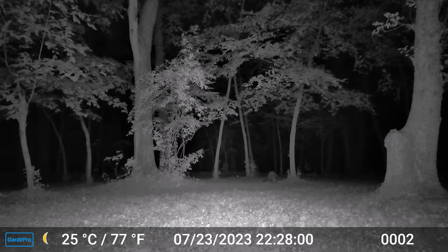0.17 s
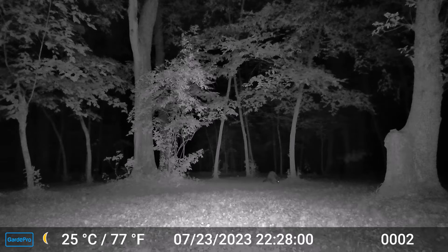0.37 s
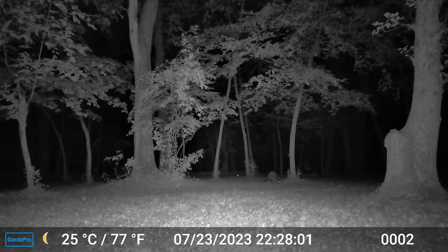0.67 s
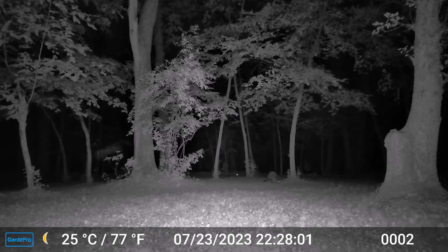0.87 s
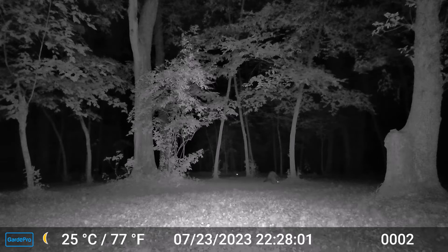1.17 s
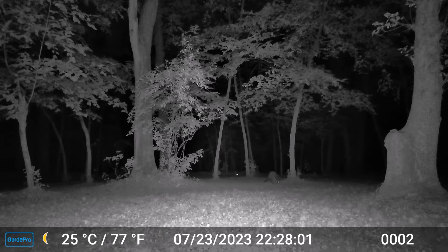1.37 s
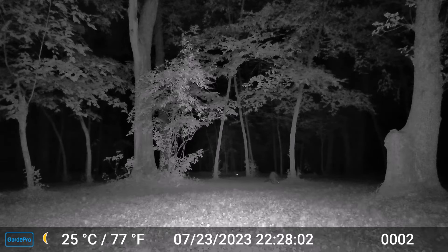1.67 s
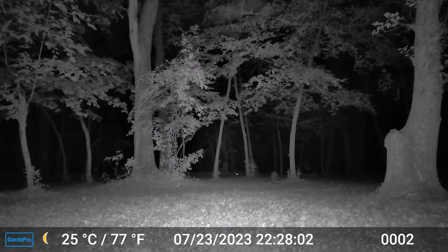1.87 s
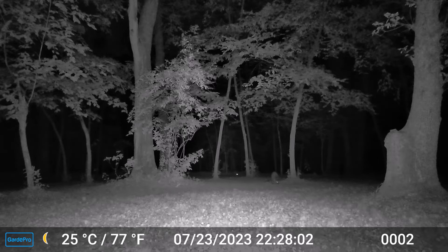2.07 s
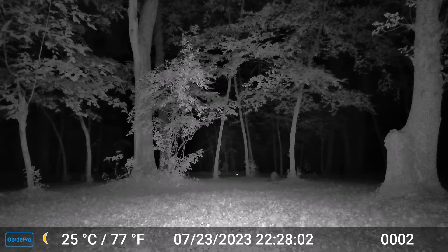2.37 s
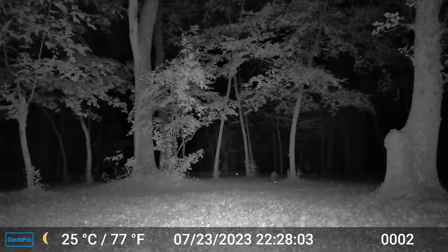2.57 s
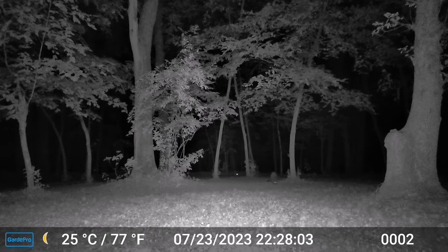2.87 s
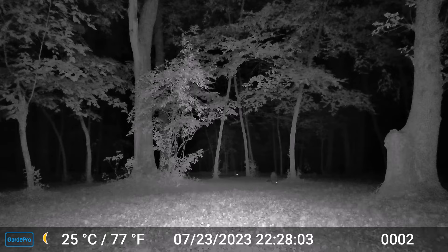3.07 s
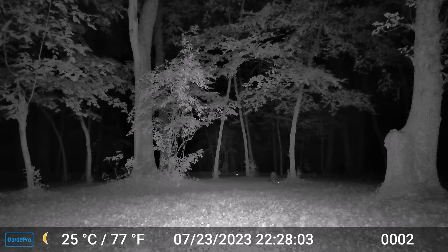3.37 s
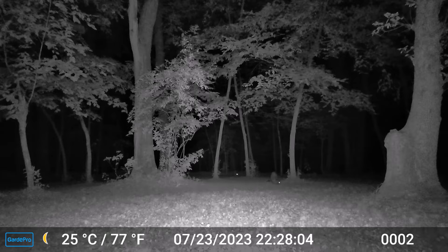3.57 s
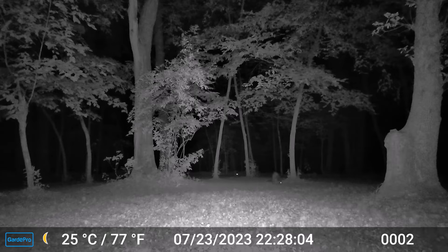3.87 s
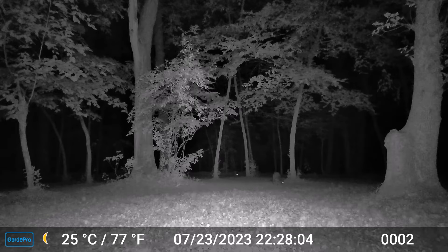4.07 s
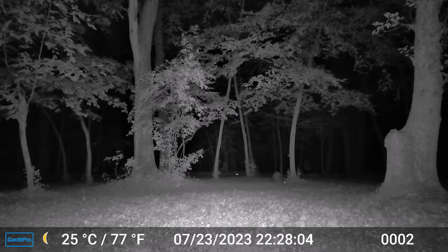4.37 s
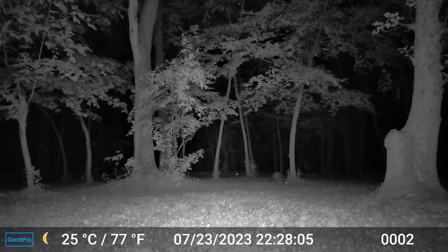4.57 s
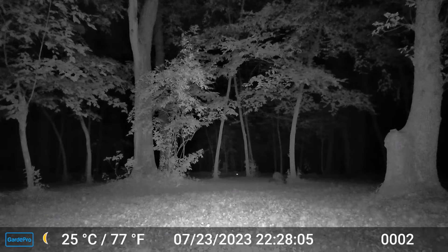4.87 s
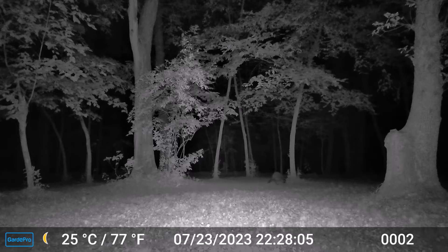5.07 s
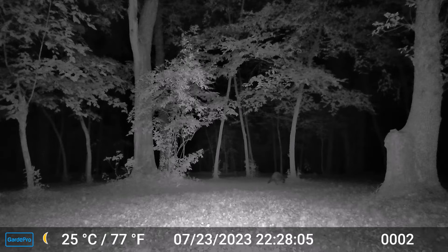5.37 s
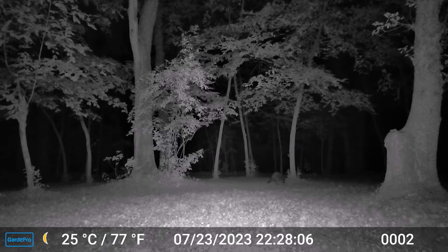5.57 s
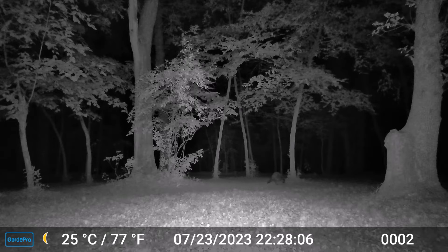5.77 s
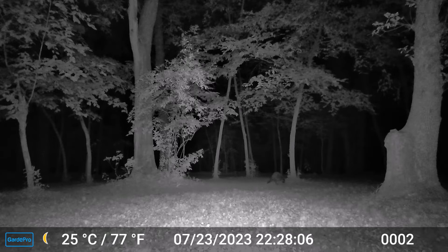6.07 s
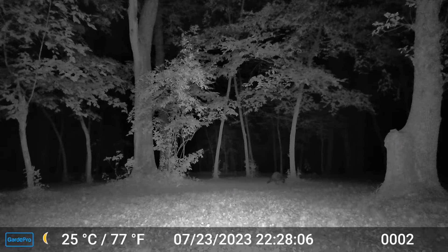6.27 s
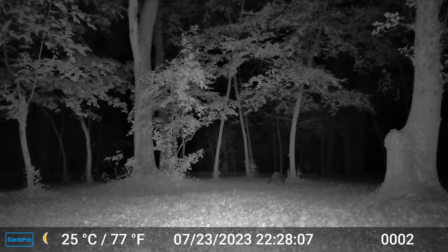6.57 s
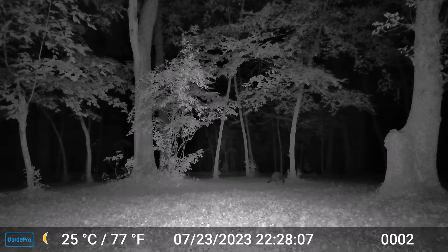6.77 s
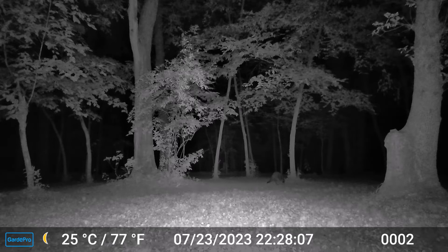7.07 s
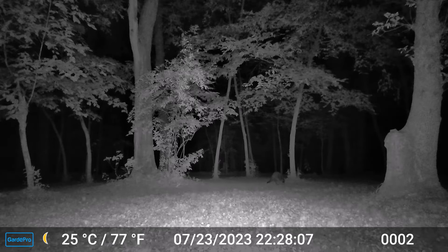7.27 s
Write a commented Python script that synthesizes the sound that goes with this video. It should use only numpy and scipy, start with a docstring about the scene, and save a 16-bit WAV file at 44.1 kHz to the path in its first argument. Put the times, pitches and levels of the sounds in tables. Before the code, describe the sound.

Pulsed katydid rasping alternates between close and far in dark woods, with soft cricket trills, faint insect shimmer, dull thuds and a deep rumble.

```python
"""A near katydid rasps in bursts of five to eight strokes at a woodland edge at night, heard by a trail camera.
A duller one answers from deeper in the trees; both are wing-tooth clicks shaped by resonances and echo.
Crickets trill behind them in short falling tones, over a throbbing faint song and a hiss of distant insects.
Underneath lie a low rumble of filtered noise with soft thuds, and a faint far drone that swells twice."""
import sys
import numpy as np
from scipy import signal
from scipy.fft import rfft, irfft, next_fast_len
from scipy.io import wavfile
from scipy.ndimage import uniform_filter1d, map_coordinates

SR = 44100
rng = np.random.default_rng(int(sys.argv[2]) if len(sys.argv) > 2 else 0)


def store_wav(level_fs):
    """Save 16-bit WAV to argv[1]."""
    pcm = np.round(np.clip(np.atleast_2d(level_fs), -1, 1) * 32767)
    wavfile.write(sys.argv[1], SR, pcm.T.astype(np.int16))


N = 326781  # length of the scene in samples

# course of the low rumble, before each layer's offset: (time [s], level [dB])
RUMBLE_COURSE = [(0.0, -48.5), (0.78, -50), (0.95, -46), (1.51, -49), (1.73, -45.5), (2.06, -49),
                 (2.95, -44), (3.38, -45), (3.61, -47), (4.08, -47), (4.42, -48.5), (4.89, -45.5),
                 (5.92, -50.5), (7.41, -50)]


def near_katydid(deep_db=-16.0, low_db=-7.0, high_db=-6.0, deep_hz=2250, split_hz=3900, lead=.0075):
    """Tooth clicks ring the wing: its deepest mode peaks early in a stroke, the high ones next, the middle last."""
    # broad colour of the insect: (frequency [Hz], level [dB])
    near_body = [(1000, -47), (1400, -33), (1850, -28), (2100, -9.5), (2750, -11), (3100, 0), (3800, -6.5),
                 (4700, 4.5), (5200, -5.5), (5700, -7.5), (6200, -23.5), (7000, -30.5), (7500, -32),
                 (8000, -53.5)]
    # wing resonances, and narrow lines from the fixed echo of the leaves around the insect:
    # (frequency [Hz], width [Hz], level above the broad colour [dB])
    fine_lines = [(1624, 120, 15), (2047, 130, 11.5), (2900, 67, 6.5), (3340, 30, 4.5), (3140, 34, 6.5),
                  (3430, 61, -4), (3542, 7.3, 0), (3727, 12, 5.5), (4137, 63, 7), (4250, 12, 3),
                  (4421, 18, 4), (4670, 22, 3.5), (4930, 13, 6.5), (5352, 53, 9.5), (5730, 16, 7.5),
                  (7280, 40, 9)]
    # bursts, levels before the band offsets: (middle of first stroke, nominal [s], strokes [count],
    # stroke spacing [s], level [dB], fade by the last stroke [dB], first stroke length [s])
    near_bursts = [(0.443, 6, 0.15, -33.5, .7, .112), (2.196, 8, 0.15, -33, 1.5, .132),
                   (4.49, 7, .1526, -33, 6, .124), (6.819, 5, 0.15, -34.5, -3, 0.12)]
    shortening, dulling_db = .2, 2  # by the last stroke: share of length lost, loss of the high modes

    def colour_db(hz):
        peaks_db = sum(db * np.exp(-((hz - centre) / width) ** 2) for centre, width, db in fine_lines)
        return along(near_body, hz) + peaks_db

    deep, low, high = np.zeros((3, N))
    for s, db, progress, length in strokes(near_bursts):
        span = length * (1 - shortening * progress)
        tooth_hz = 330 * np.exp(rng.normal(0, .05))
        clicks = teeth(span, tooth_hz, jitter=.2, uneven_db=1.5, scrape=.25)
        stroke_high_db = high_db - dulling_db * progress
        parts = [(deep, deep_db, pressed(clicks, peak_at=0.45, fullness=1.4, ragged_db=2.5)),
                 (low, low_db, pressed(clicks, peak_at=0.69, fullness=2.17, ragged_db=1.5)),
                 (high, stroke_high_db, pressed(clicks, peak_at=0.55, fullness=1.05, ragged_db=1.65))]
        for track, band_db, rasp in parts:
            heard = through_woods(rasp, leaves_db=-0.5, leaves_t60=0.098, woods_db=-9.0, woods_t60=1.1)
            add(track, s - span / 2 - lead, amp(db + band_db) * heard)
    deep = coloured(deep, lambda hz: colour_db(hz) + under(hz, deep_hz))
    low = coloured(low, lambda hz: colour_db(hz) + under(deep_hz, hz) + under(hz, split_hz))
    high = coloured(high, lambda hz: colour_db(hz) + under(split_hz, hz))
    return deep + low + high


def far_katydid(low_db=-6.5, high_db=-7.5, split_hz=2800, length=0.1, lead=.062):
    """The same kind of rasp, dulled by the trees between; each stroke climbs from low modes to higher ones."""
    # broad colour at this distance: (frequency [Hz], level [dB])
    far_body = [(1300, -39), (1950, -17), (2150, -2.5), (2550, -2), (2800, -8), (3050, -9), (3280, -1.5),
                (3530, -5.5), (3700, -15), (5000, -26), (6500, -54)]
    # bursts, levels before the band offsets: (middle of first stroke, nominal [s], strokes [count],
    # stroke spacing [s], level [dB], fade by the last stroke [dB])
    far_bursts = [(0.015, 2, .149, -49.5, 0.7), (1.173, 4, .153, -50.5, 0.5), (2.713, 6, .154, -44, 10),
                  (4.556, 4, .151, -43.5, 6.5), (6.197, 4, .148, -48.5, -1.3)]
    low, high = np.zeros((2, N))
    for s, db, _ in strokes(far_bursts):
        clicks = teeth(length, tooth_hz=295.5, jitter=0.17, uneven_db=1.5, scrape=0.34)
        parts = [(low, low_db, pressed(clicks, peak_at=0.51, fullness=1.0, ragged_db=2.5)),
                 (high, high_db, pressed(clicks, peak_at=0.73, fullness=0.97, ragged_db=1.3))]
        for track, band_db, rasp in parts:
            heard = through_woods(rasp, leaves_db=-2, leaves_t60=0.088, woods_db=-5.5, woods_t60=1.0)
            add(track, s - lead, amp(db + band_db) * heard)
    low = coloured(low, lambda hz: along(far_body, hz) + under(hz, split_hz))
    high = coloured(high, lambda hz: along(far_body, hz) + under(split_hz, hz))
    return low + high


def strokes(bursts, fade_power=2.2, scatter_db=.5):
    """Evenly paced strokes, their level change late in the burst: (s, dB, progress 0-1, further columns)."""
    for start, count, period, db, fade_db, *rest in bursts:
        for k, progress in enumerate(np.linspace(0, 1, round(count))):
            level_db = db - fade_db * progress ** fade_power + rng.normal(0, scatter_db)
            yield (start + k * period, level_db, progress, *rest)


def teeth(length, tooth_hz, jitter, uneven_db, scrape):
    """A scraper drawn over the wing's file: a click per tooth, with some friction between."""
    n = int(length * SR)
    gaps = np.exp(jitter * rng.standard_normal(128)) / tooth_hz
    at = ((np.cumsum(gaps) - gaps[0] * rng.random()) * SR).astype(int)
    strengths = amp(uneven_db * rng.standard_normal(128))
    clicks = np.bincount(at, strengths, n)[:n]
    return unit(clicks) + scrape * rng.standard_normal(SR // 2)[:n]


def pressed(clicks, peak_at, fullness, ragged_db):
    """The wing pressure swells unevenly to a peak at some share of the stroke, then lets go."""
    u = np.linspace(0, 1, len(clicks))
    phase = np.interp(u, [0, peak_at, 1], [0, .5, 1])
    swell = np.abs(np.sin(np.pi * phase)) ** fullness  # a higher power narrows the peak
    slips = np.interp(u, np.linspace(0, 1, 10), rng.standard_normal(10))
    return unit(clicks * swell * amp(ragged_db * slips))


def near_cricket(level_db=0.3, scatter_db=2.5, trill_s=.18, pulse_hz=29.3):
    """Bouts of short, evenly spaced trills, each a run of falling pulses, one per wing closure."""
    # bouts, before the level offset: (start [s], trills [count], trill spacing [s], level [dB])
    cricket_bouts = [(0.04, 3, 0.23, -54), (1.34, 3, .325, -52.5), (3.36, 4, .283, -53),
                     (5.645, 4, .247, -52.5)]
    track = np.zeros(N)
    for start, count, period, db in cricket_bouts:
        for trill in start + period * np.arange(round(count)):
            for s in trill + np.arange(0, trill_s, 1 / pulse_hz):
                pulse = cricket_pulse(pitch_hz=4835 + rng.normal(0, 11), fall_hz=460, length=.021)
                pulse_db = db + level_db + rng.normal(0, scatter_db)
                add(track, s + rng.normal(0, 0.00093), amp(pulse_db) * pulse)
    return track + amp(-4) * scattered(track, t60=.3)[:N]


def far_crickets(level_db=-61.5, count=4):
    """More crickets, each at its own pitch and pace, merge into one shimmering line."""
    track = np.zeros(N)
    for spread, pace, start in rng.uniform(-1, 1, (count, 3)):
        for s in np.arange(start - 1, N / SR, 1 / (30 + 3 * pace)):
            pitch_hz = 4830 + 50 * spread + rng.normal(0, 15)
            pulse = cricket_pulse(pitch_hz, fall_hz=320, length=.019)
            add(track, s + rng.normal(0, 0.0017), amp(rng.normal(0, 1.3)) * pulse)
    return amp(level_db) * unit(track + amp(-2.5) * scattered(track, t60=.4)[:N])


def cricket_pulse(pitch_hz, fall_hz, length):
    """One wing closure: a pure tone that sags as the wing slows."""
    u = np.linspace(-.5, .5, int(length * SR))
    phase = 2 * np.pi * np.cumsum(pitch_hz - fall_hz * u) / SR
    return np.cos(np.pi * u) * np.sin(phase)


def tree_crickets(level_db=-66.5, pitch_hz=3080, width_hz=110, throb_hz=3.7, depth_db=4.5):
    """A faint lower song from far away: a narrow band of noise, throbbing loosely."""
    def band_db(hz):
        return -20 * np.log10(1 + ((hz - pitch_hz) / (2 * width_hz)) ** 2)

    song = unit(coloured(rng.standard_normal(N), band_db))
    throb = np.cos(2 * np.pi * throb_hz * np.arange(N) / SR + .6 * wobble(1.7))
    return amp(level_db + depth_db * throb + 1.5 * wobble(8)) * song


def chorus(level_db=-57.5):
    """The hiss of countless distant insects: coloured noise with a drifting level."""
    # colour of the hiss: (frequency [Hz], spectral level [dB])
    hiss_colour = [(200, 2), (700, -0.5), (1300, -4.5), (2100, 1.5), (2750, -0.5), (3060, 4), (3600, -1),
                   (4400, 3.5), (5400, -2), (5900, 1), (6400, 7.5), (6850, -0.5), (7250, -8), (8000, -25.5)]
    drift_db = 1.0 * wobble(1.9) + .7 * wobble(14)
    return amp(level_db + drift_db) * noise(hiss_colour)


def rumble(rumble_db=1.5, drone_db=-14.5, swell_width_hz=90, swell_peak_db=5):
    """A restless low rumble of noise; a far drone follows it and swells twice above it."""
    # colours of rumble and drone: (frequency [Hz], spectral level [dB])
    bass_colour = [(11, -38), (18, -13), (54, 1), (86, 0.5), (140, -4.5), (243, -22), (300, -26.5),
                   (390, -41), (660, -120)]
    drone_colour = [(110, -6.5), (180, 4.5), (270, -2.5), (340, 0), (420, 1.5), (490, -4.5), (570, -14.5),
                    (900, -35)]
    # swells of the drone: (time of the top [s], level [dB], rise [s], fall [s], strongest pitch [Hz])
    drone_swells = [(2.08, -50.5, .2, 0.34, 249), (5.019, -53, 0.1, .1, 311)]
    level_db, = curves(RUMBLE_COURSE)
    t = np.arange(N) / SR
    bass = amp(level_db + rumble_db + 2.56 * wobble(12)) * noise(bass_colour)
    drone_level_db = level_db + drone_db + 1.2 * wobble(8)
    drone = amp(drone_level_db) * patchy(noise(drone_colour), depth_db=3.0)
    for s, db, rise, fall, pitch_hz in drone_swells:
        tone = coloured(noise(drone_colour),
                        lambda hz: swell_peak_db * np.exp(-((hz - pitch_hz) / swell_width_hz) ** 2))
        swell = np.exp(-np.maximum((s - t) / rise, (t - s) / fall))
        drone += amp(db) * swell * patchy(tone, depth_db=4.0)
    return bass + drone


def thuds(level_db=1.0, lead=0.0022, random_db=7, scatter_db=3.0, count=12):
    """Many distinct thuds at set times, and a dozen at random that follow the rumble's level."""
    # the distinct thuds, before the level offset: (time [s], level [dB])
    set_thuds = [(0.378, -32), (0.741, -28.5), (0.761, -30), (0.892, -33.5), (1.085, -33.5), (1.215, -31),
                 (1.311, -33.5), (1.843, -32), (1.911, -33), (2.113, -31.5), (2.614, -29.5), (2.806, -32),
                 (3.037, -28), (3.121, -32), (3.437, -32), (5.22, -34), (7.054, -35), (7.197, -34.5)]
    track = np.zeros(N)
    rumble_level_db, = curves(RUMBLE_COURSE)
    for s, db in set_thuds:
        add(track, s - lead, amp(db + level_db) * thud())
    # one random thud in each equal share of the scene
    places = ((np.arange(count) + rng.random(count)) * N / count).astype(int)
    for at in places:
        db = rumble_level_db[at] + random_db + rng.normal(0, scatter_db)
        add(track, at / SR, amp(db) * thud())
    return track


def thud(thud_hz=80, rise=0.01):
    """A dull push of a few slow cycles, its pitch scattered around thud_hz."""
    t = np.arange(SR // 5) / SR
    swell = (t / rise) ** 2 * np.exp(2 - 2 * t / rise)
    pitch_hz = thud_hz * np.exp(rng.normal(0, 0.22))
    return swell * np.sin(2 * np.pi * pitch_hz * t)


def through_woods(x, leaves_db, leaves_t60, woods_db, woods_t60):
    """The direct sound, quick scatter from leaves and the long echo among the trunks."""
    paths = amp(leaves_db) * echo_tail(leaves_t60) + amp(woods_db) * echo_tail(woods_t60)
    paths[0] += 1  # the direct path
    return signal.fftconvolve(x, paths)


def scattered(x, t60):
    """A diffuse echo of x, from a tail of unit energy."""
    return signal.fftconvolve(x, echo_tail(t60))


def echo_tail(t60):
    """One second of diffuse echo with unit energy, falling 60 dB in t60 seconds."""
    t = np.arange(SR) / SR
    tail = rng.standard_normal(SR) * np.exp(-np.log(1000) * t / t60)
    return tail / np.sqrt(np.sum(tail ** 2))


def patchy(x, depth_db):
    """Narrow bands of x swell and fade, neighbours loosely together."""
    z = signal.stft(x, nperseg=4096)[2]
    field = uniform_filter1d(rng.standard_normal(z.shape), size=4, axis=0)  # smooth over frequency
    field = uniform_filter1d(field, size=4, axis=1)  # smooth over time
    return unit(signal.istft(z * amp(depth_db * unit(field)), nperseg=4096)[1][:N])


def noise(spectrum):
    """Noise of rms 1 that falls away steeply above its last point."""
    def colour_db(hz):
        return along(spectrum, hz) - 60 * np.log10(np.maximum(hz / spectrum[-1][0], 1))

    return unit(coloured(rng.standard_normal(N), colour_db))


def coloured(x, db_of_hz):
    """Causal minimum-phase filter with the given dB curve; white noise keeps its power."""
    m = 2 * next_fast_len(N // 2 + SR // 2)
    gain = unit(amp(db_of_hz(np.fft.rfftfreq(m, 1 / SR))))
    cepstrum = irfft(np.log(np.maximum(gain, 1e-6)))
    # folding the cepstrum onto positive times makes the filter causal
    cepstrum[1:m // 2] *= 2
    cepstrum[m // 2 + 1:] = 0
    return irfft(rfft(x, m) * np.exp(rfft(cepstrum)), m)[:N]


def under(hz, edge_hz):
    """dB of a steep slope that passes what lies under the edge; swap the arguments to pass what lies above."""
    return -10 * np.log10(1 + ((hz + 1) / (edge_hz + 1)) ** 60)


def along(points, hz):
    """Interpolates (Hz, value) points on a log frequency axis."""
    f, v = np.transpose(points)
    return np.interp(np.log(hz + 1), np.log(f), v)


def curves(rows):
    """One value per sample for each column after the time."""
    s, *cols = np.transpose(rows)
    return [np.interp(np.arange(N) / SR, s, c) for c in cols]


def wobble(rate):
    """A smooth random curve, rate knots a second."""
    knots = rng.standard_normal(int(N * rate / SR) + 4)
    return map_coordinates(knots, [np.arange(N) * rate / SR])


def add(track, s, sound):
    """Mix a sound into a track from time s on."""
    at = round(s * SR) + np.arange(len(sound))
    inside = (at >= 0) & (at < N)
    track[at[inside]] += sound[inside]


def amp(db):
    """Amplitude factor of a level in dB."""
    return 10 ** (np.asarray(db) / 20)


def unit(x):
    """Scale x to rms 1."""
    return x / np.sqrt(np.mean(x ** 2) + 1e-20)


def scene():
    """All insects over the rumble and thuds, in one channel."""
    katydids = near_katydid() + far_katydid()
    crickets = near_cricket() + far_crickets() + tree_crickets()
    return (katydids + crickets + chorus() + rumble() + thuds())[None]


def record(dry, top_hz=8080):
    """The camera keeps nothing above its band limit."""
    m = next_fast_len(N + SR // 2)
    kept = np.fft.rfftfreq(m, 1 / SR) < top_hz
    return irfft(rfft(dry, m) * kept, m)[:, :N]


dry = scene()
out = record(dry)
store_wav(out)
```